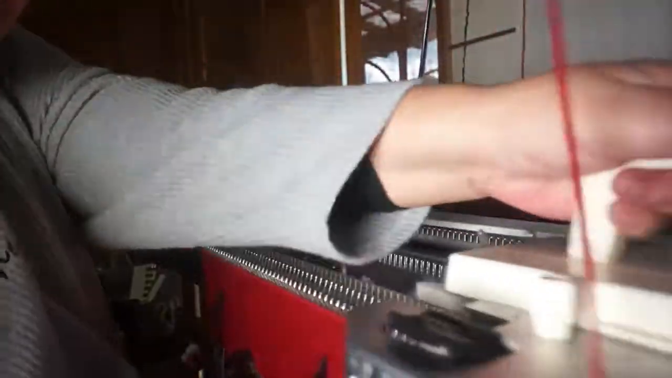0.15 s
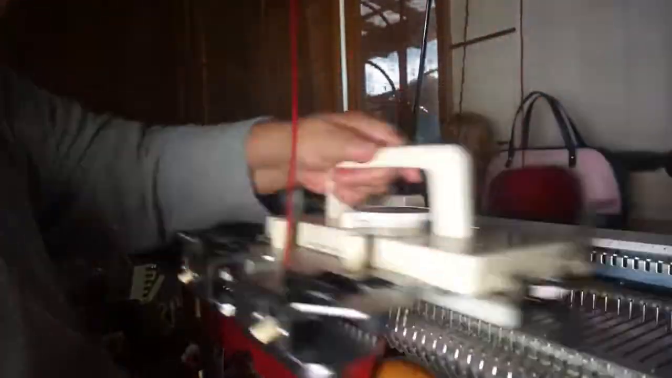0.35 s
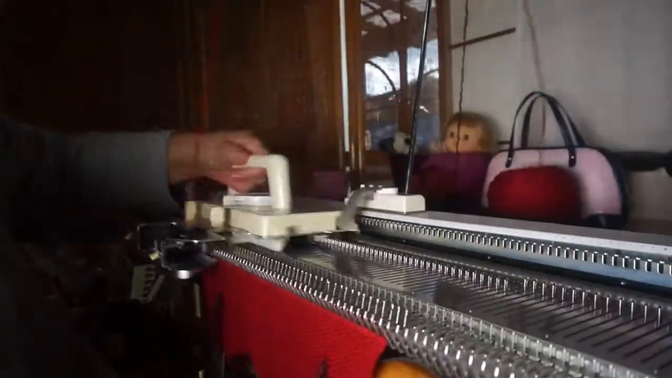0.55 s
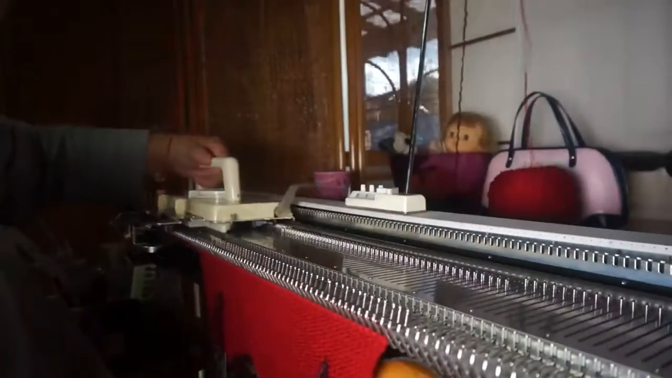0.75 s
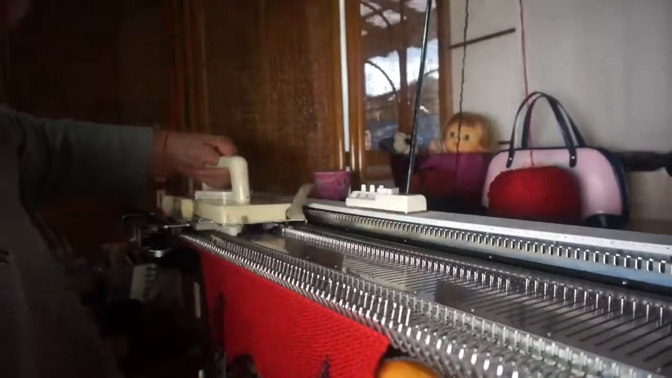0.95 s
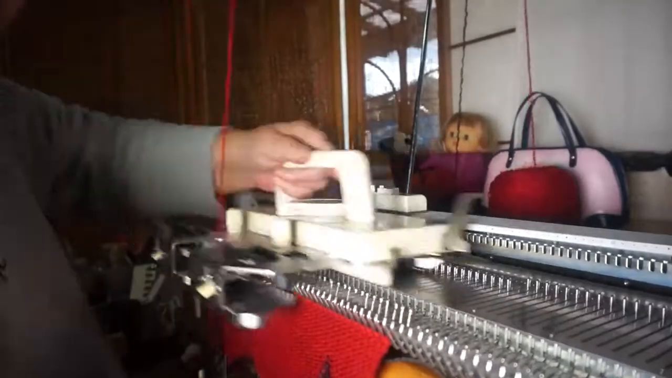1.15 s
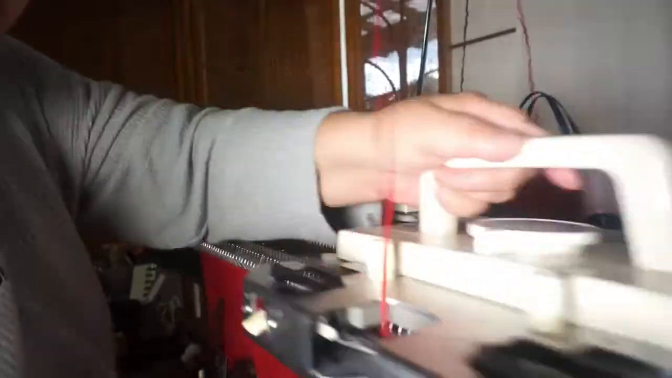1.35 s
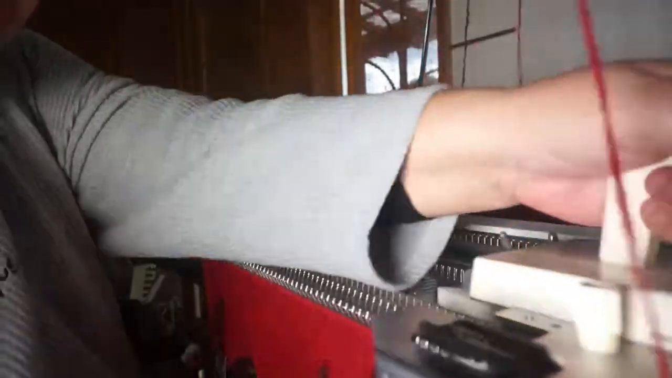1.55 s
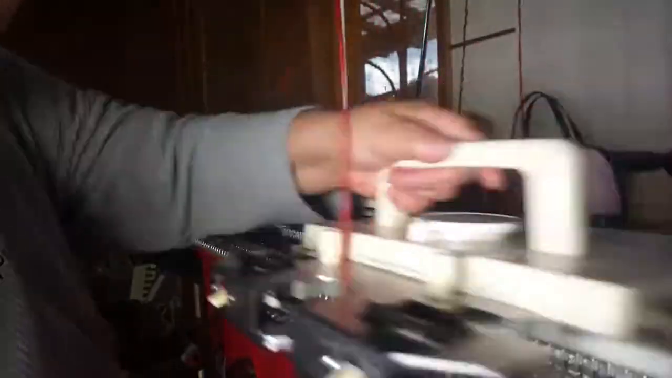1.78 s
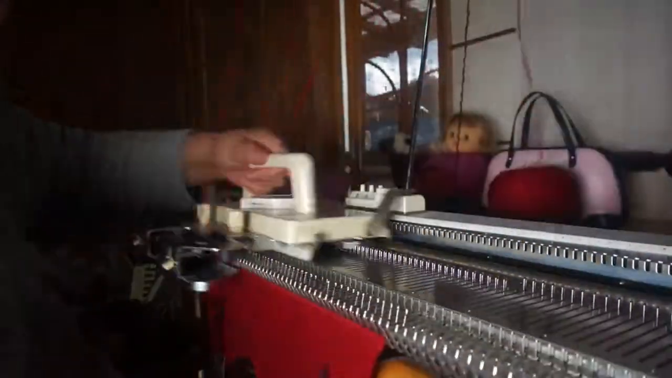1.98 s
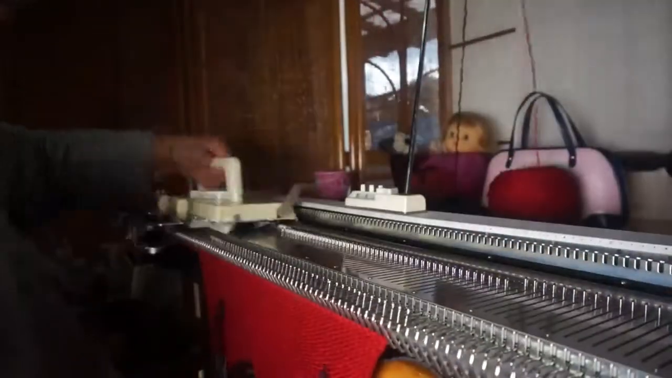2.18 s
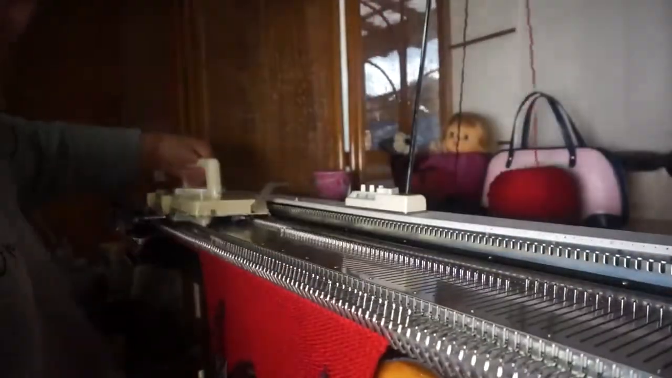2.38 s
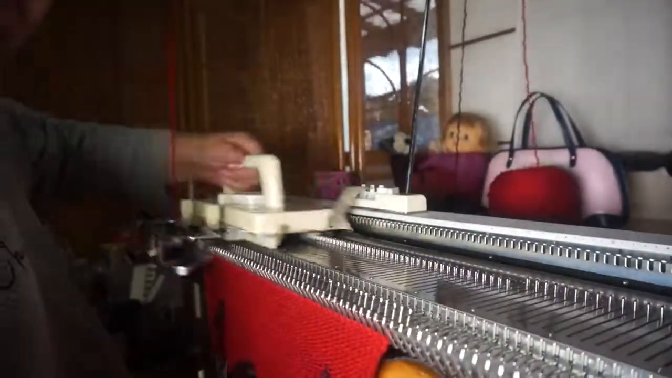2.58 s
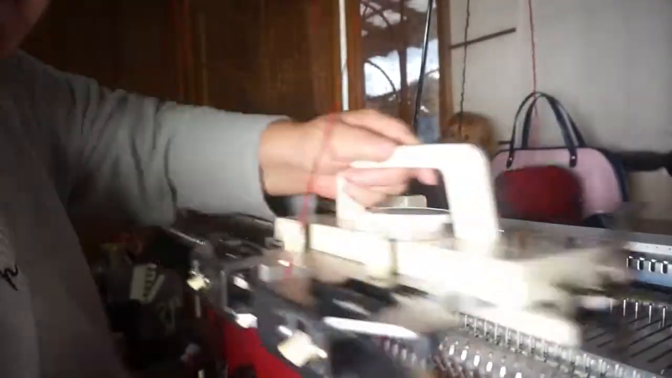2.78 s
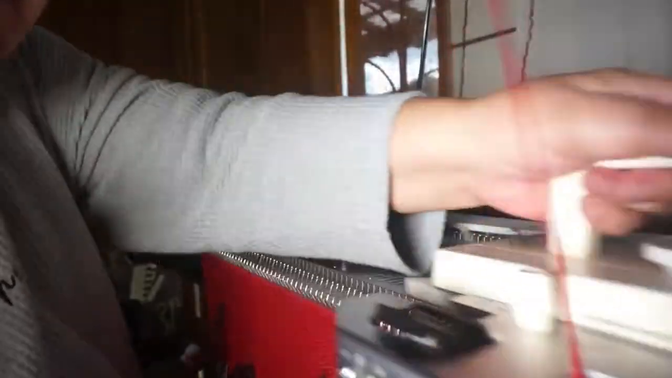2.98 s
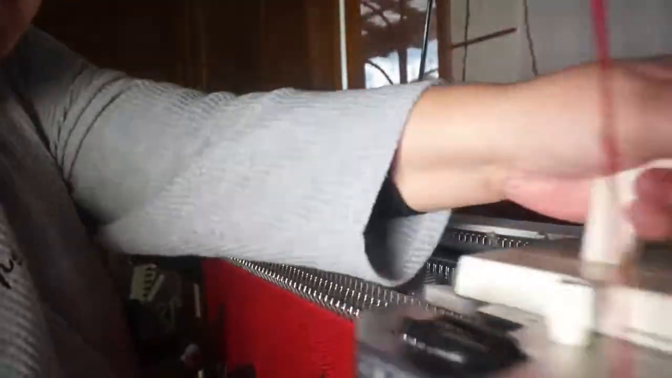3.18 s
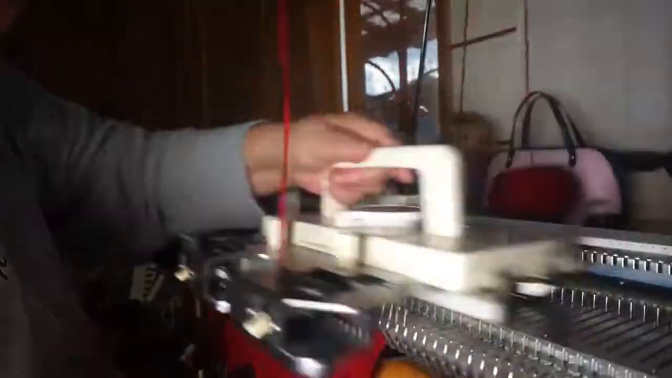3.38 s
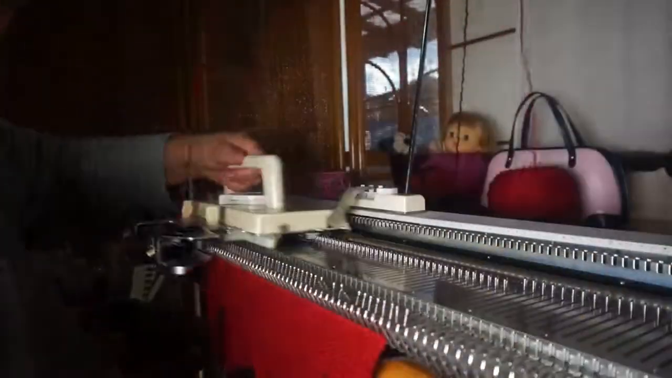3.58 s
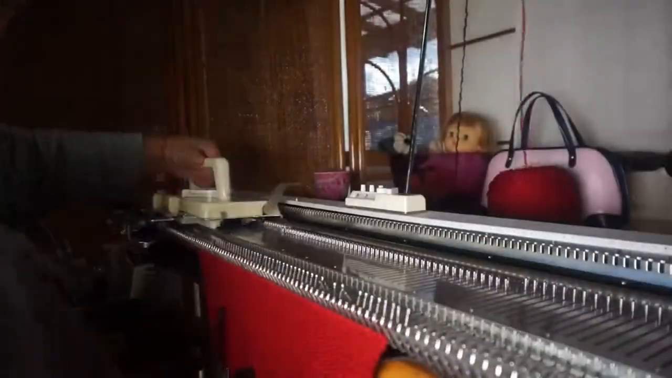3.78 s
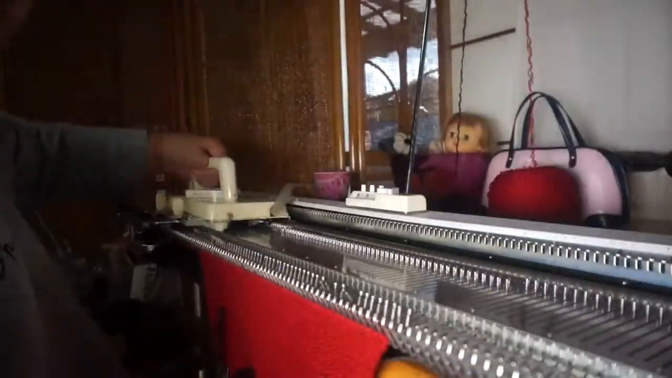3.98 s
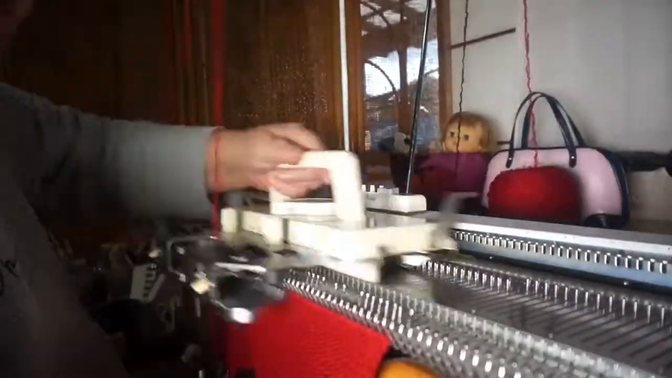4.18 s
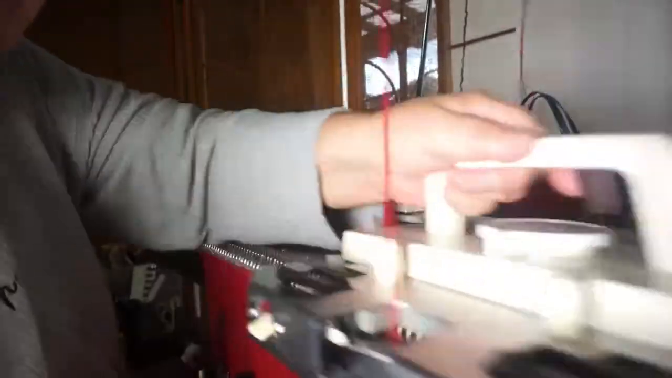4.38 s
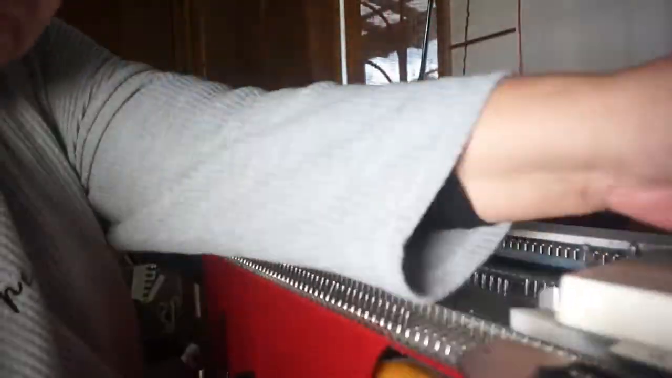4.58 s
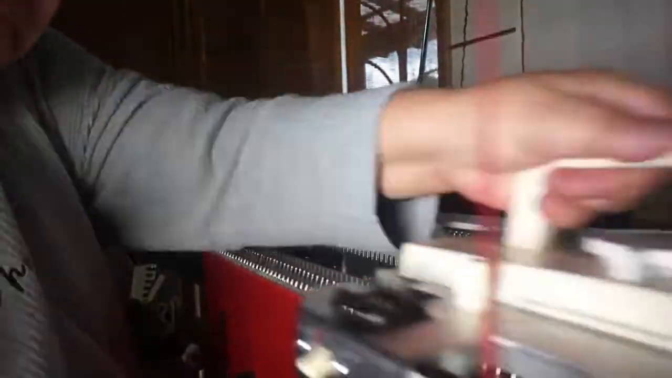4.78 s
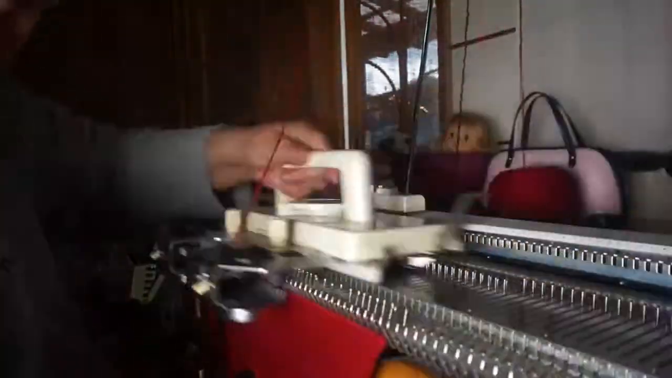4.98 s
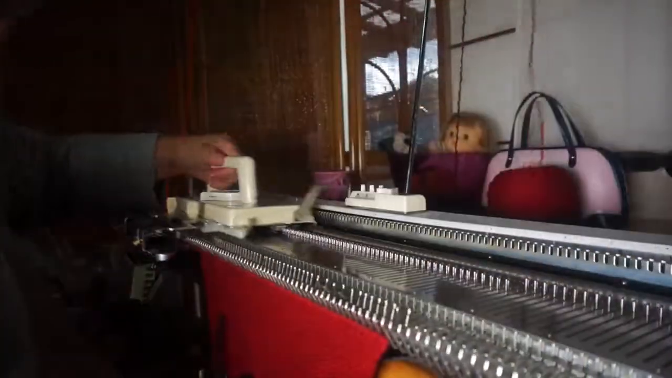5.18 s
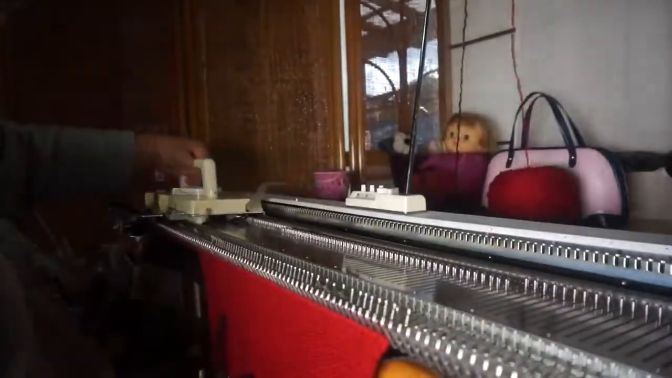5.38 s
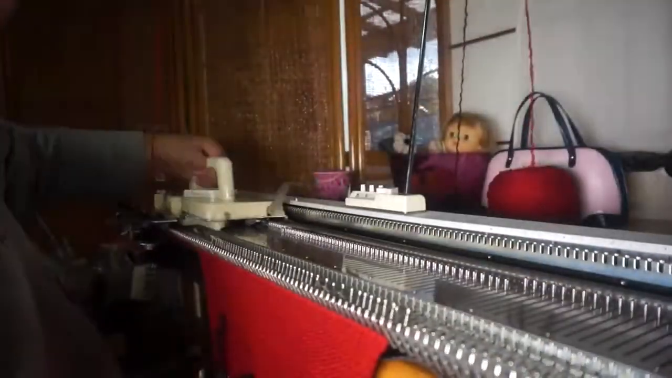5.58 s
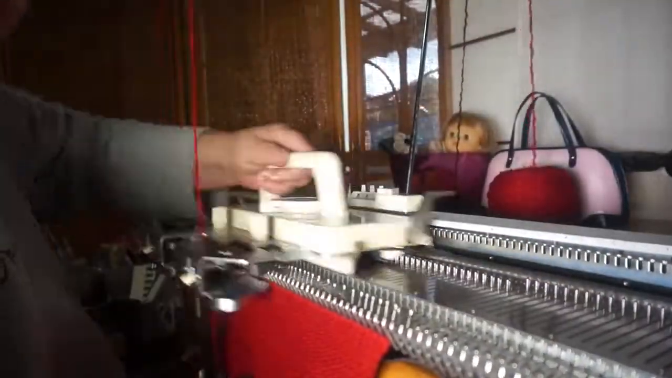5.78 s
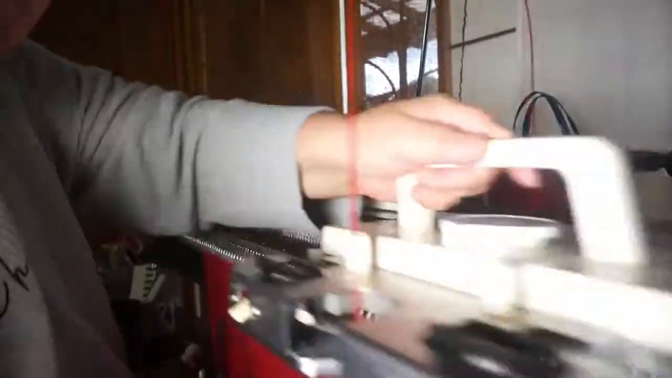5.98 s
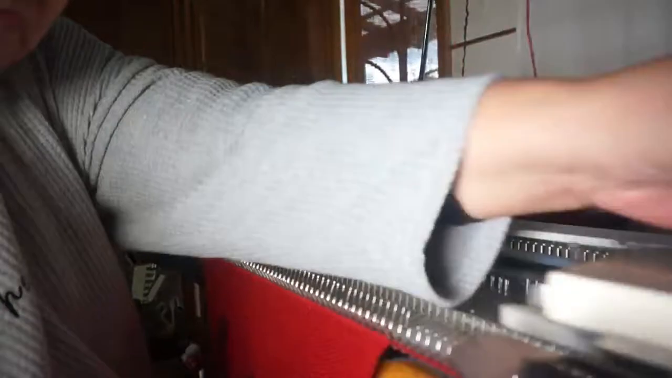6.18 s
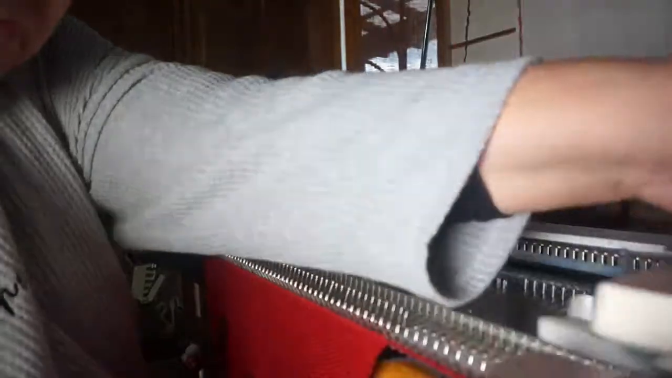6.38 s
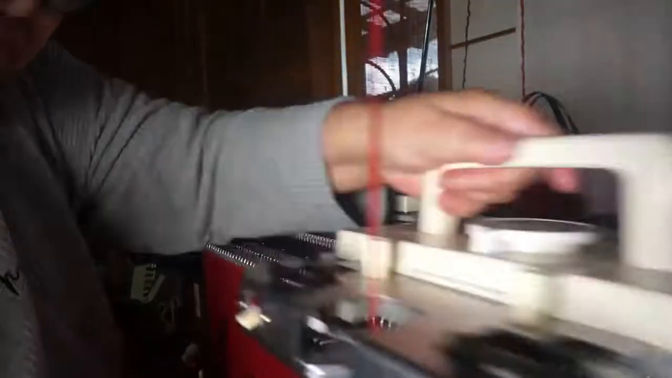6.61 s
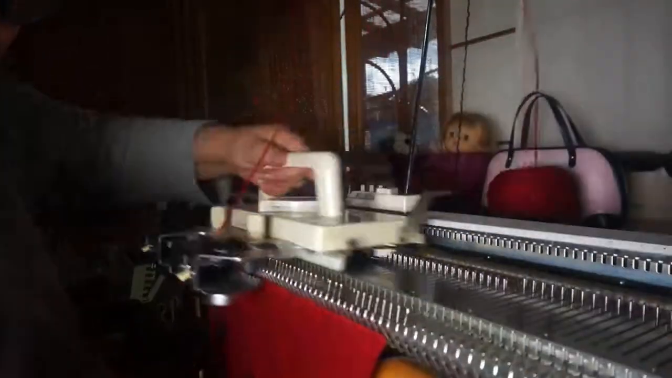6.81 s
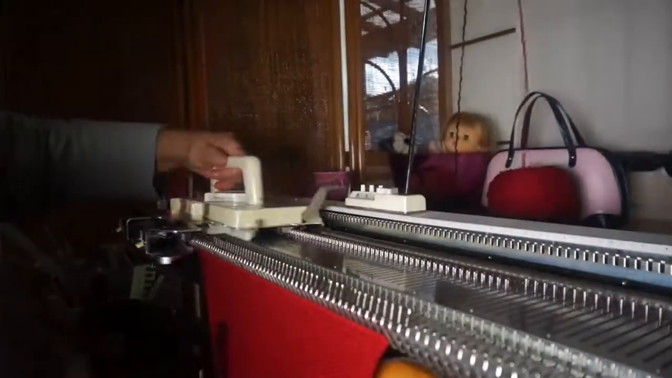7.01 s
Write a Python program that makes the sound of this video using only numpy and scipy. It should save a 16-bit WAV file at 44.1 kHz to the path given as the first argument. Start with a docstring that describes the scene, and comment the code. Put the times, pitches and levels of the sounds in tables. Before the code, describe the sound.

A hand-pushed knitting machine carriage rasps rapidly back and forth across steel needles, with sharp catch and lever snaps, in a small quiet room.

```python
"""A knitting machine carriage slides out of one pull, a latch cracks, then nine passes follow in a small room.
Cams strike the steel needle butts, over 200 a second at top speed: jittered ticks and scrapes through resonances.
Clear of the needles the carriage rubs along its rail: scraped noise through combs that glide with its place.
Catches and a trip lever snap, the shell rocks and the table shudders: short noise bursts through resonances.
Behind it lie quiet room air (shaped noise) and a faint wavering hum (two sines)."""
import sys
import numpy as np
from scipy import signal
from scipy.fft import rfft, irfft, next_fast_len
from scipy.io import wavfile
from scipy.ndimage import map_coordinates

SR = 44100
rng = np.random.default_rng(int(sys.argv[2]) if len(sys.argv) > 2 else 0)


def transcribe(u):
    """Save the signal u as a 16-bit wav file named by the first command-line argument.

    u: samples, shape (n,) or (channels, n), limited to [-1, 1]; the rate is SR.
    q: integer samples, one column per channel.
    """
    v = np.clip(np.atleast_2d(u).T, -1, 1)
    q = np.round(v * 32767).astype(np.int16)
    wavfile.write(sys.argv[1], SR, q)


N = 310884
TOP_HZ = 11150

# room air spectrum: f/Hz, relative level/dB
AIR_SPECTRUM = [(25, -33), (60, -0.5), (105, -6.5), (150, 2.5), (220, 2.5), (300, -7.5), (400, -1),
                (550, -23.5), (850, -10.5), (1300, -17.5), (3000, -32), (11000, -45)]
# hum partials: f/Hz, mean level/dB rms
HUM_PARTIALS = [(105, -70.5), (215, -73.5)]
# reverberation: f/Hz, t60/s
ROOM_T60 = [(150, 0.24), (1000, 0.31), (4000, .24), (11000, 0.13)]
# left-right likeness: f/Hz, likeness/1
EAR_LIKENESS = [(30, .9), (110, 1), (300, 0.91), (600, .93), (1200, 0.8), (2500, 0.86), (4200, 0.72),
                (7500, 0.86), (11000, .93)]

# cam latch and other small catches: t/s, relative level/dB, treble/dB (half is added to the crack)
CATCH_EVENTS = [(0.0598, -13, -15.5), (0.236, -46, -14), (0.7422, -19.5, -11.5), (0.95, -37, -10),
                (1.5414, -15, -10), (1.5848, -26, -7.5), (2.217, -18, -8), (2.4658, -36, -16.5),
                (3.0106, -23.5, -14.5), (3.0565, -16, -6.5), (3.745, -18, -8), (3.982, -35, -13),
                (4.5082, -24, -12), (4.5496, -15, -12), (4.754, -53, -20.5), (5.5622, -37, -14),
                (6.1789, -12.5, -16), (6.2407, -37.5, -12), (6.52, -46, -12), (6.555, -37.5, -9.5)]
# carriage strikes the trip lever: t/s, snap level/dB, relative knock level/dB
TRIP_EVENTS = [(.631, -17, -19), (1.131, -32.5, -20.5), (2.115, -16.5, -23), (2.64, -33.5, -28.5),
               (3.648, -17.5, -22.5), (4.185, -37.5, -29.5), (5.18, -19.5, -23.5), (5.81, -27.5, -22.5),
               (6.973, -15.5, -20.5)]
# loose shell rocks as the hand turns round: t/s, relative level/dB
ROCK_EVENTS = [(0.173, -41), (0.233, -54), (1.588, -40), (1.66, -37), (2.452, -45), (3.913, -35),
               (3.982, -37.5)]
# table shudders faintly under the moving carriage: t/s, level/dB
SHUDDER_EVENTS = [(1.18, -54), (2.71, -54), (2.93, -50), (3.64, -52), (4.33, -55), (5.735, -51)]

# table resonances: f/Hz, width/Hz, relative level/dB
TABLE_MODES = [(65, 25, 0), (100, 30, -1.5), (160, 35, -4)]
# shell jolted by the lever: f/Hz, width/Hz, relative level/dB
KNOCK_MODES = [(394, 38, -13), (491.8, 40, -7.5), (586.2, 30, 1), (713, 50, 0.5), (816, 46, 4.5),
               (980, 110, -6.5), (1420, 88, -7.5)]
# steel catches: f/Hz, width/Hz, relative level/dB
LATCH_MODES = [(837, 110, -12), (960, 59, -4.5), (1080, 52, -4), (2066, 33, -7), (2620, 60, -9),
               (2992, 45, -3.5), (4234, 65, -2.5), (6780, 93, -5), (9000, 79, -4.5), (10640, 330, -7)]
# carriage shell: f/Hz, width/Hz, relative level/dB
SHELL_MODES = [(591.3, 28.5, -4.5), (661, 46, 0), (723, 44, 2), (811, 21, 4), (967, 52, 0.5)]
# shell sliding freely: f/Hz, width/Hz, relative level/dB
HOLLOW_MODES = [(336, 16, -24.5), (612, 37, 0.5), (695, 43, -3), (808, 87, -1.5)]
# rail: f/Hz, width/Hz, relative level/dB
RAIL_MODES = [(1705, 33, -0.5), (1950, 70, 0), (2207, 47, 2), (2980, 136, 0), (4164, 30, -1.5),
              (5246, 59.8, -3), (6520, 120, -6.5), (7150, 43, -7), (7850, 63, -2.5), (8070, 59, -13),
              (9560, 160, -12.5)]
# needle bed: f/Hz, width/Hz, relative level/dB
BED_MODES = [(1336, 57, -1.5), (1710, 47, -1), (2690, 149, 0), (5229, 229, -2), (11130, 650, -10)]
# idle needles, far end: f/Hz, width/Hz, relative level/dB
FAR_RING_MODES = [(3450, 2.2, -11), (5130, 4.1, -2.5), (5222, 3.27, 3), (5170, 4.5, -5), (7160, 4, -16.5)]
# idle needles, near end: f/Hz, width/Hz, relative level/dB
NEAR_RING_MODES = [(4942, 4, 0), (5195, 4, -4)]

# crack of a catch: f/Hz, relative level/dB
CRACK_SPECTRUM = [(200, -32.5), (700, 2.5), (3000, 2.5), (7000, -2), (11000, -5.5)]
# snap of the trip lever: f/Hz, relative level/dB
SNAP_SPECTRUM = [(400, -25), (1300, -3), (3000, -10), (4500, -4), (6300, 5), (8000, -5), (11000, -10.5)]
# butts rasping in the cams: f/Hz, relative level/dB
RASP_SPECTRUM = [(500, -36), (950, -3), (1500, -3.5), (2100, -1.5), (2700, -0.5), (3150, 1), (3500, -5),
                 (4500, -4.5), (5200, -2), (5800, -4), (6600, -2.5), (8000, -6.5), (9800, -10),
                 (11000, -10)]
# carriage rubbing on the rail: f/Hz, relative level/dB
SLIDE_SPECTRUM = [(600, -43.5), (1200, -5.5), (2000, -1.5), (3000, -0.5), (3700, -3), (6500, -3.5),
                  (9000, -7.5), (11200, -12.5)]
# low growl of the carriage: f/Hz, relative level/dB
GROWL_SPECTRUM = [(50, -28.5), (130, -12.5), (185, -3.5), (225, 2), (290, -4.5), (380, -0.5), (470, 6),
                  (600, -8), (1000, -37.5)]

# pushes away from the near end: sets off t/s, first cam meets needles t/s, main cam meets them t/s,
# leaves them t/s, top speed/(needles/s), run-in level/dB, run-out level/dB
PUSH_PASSES = [(0.221, 0.254, 0.357, 0.617, 232.0, -49.4, -30.7),
               (1.684, 1.735, 1.804, 2.109, 222.0, -54.8, -26.5),
               (3.24, 3.292, 3.394, 3.642, 238.0, -53.7, -28.5),
               (4.735, 4.838, 4.931, 5.193, 234.0, -56.7, -27.6),
               (6.47, 6.577, 6.675, 6.958, 217.0, -59.3, -30.3)]
# pulls back to the near end, first one already under way: same columns
PULL_PASSES = [(-0.55, -0.48, -0.42, -0.051, 226.0, -42.0, -29.4),
               (0.922, 1.007, 1.053, 1.401, 227.0, -33.0, -25.9),
               (2.427, 2.53, 2.585, 2.94, 226.0, -36.7, -28.4),
               (3.949, 4.029, 4.106, 4.438, 225.0, -40.0, -27.5),
               (5.508, 5.646, 5.726, 6.071, 228.0, -40.9, -27.6)]
# arm speed through a push: stage/1, share of top speed/1
# stages: 0 sets off, 1 first cam, 2 main cam, 3 leaves needles, 4 stops
PUSH_ARM = [(0, .11), (.8, .25), (1.3, .76), (2.25, 1), (3, .7), (3.6, .47), (4, .11)]
# arm speed through a pull: stage/1, share of top speed/1
PULL_ARM = [(0, .11), (1, .52), (2, .85), (2.4, 1), (3, .75), (4, .11)]
LAST_STOP_S = 7.28

WORK_DB = -20.8  # steel rasp, both cams in the needles
# shell levels ahead of its own trim
SHELL_WORK_DB = -8.6  # re needle work
SHELL_SLIDE_NEAR_DB, SHELL_SLIDE_FAR_DB = -10, -4.8  # re sliding
CREEP_NEAR_DB, CREEP_FAR_DB = -67, -52  # faint rub, left even at a crawl
DULL_BELOW_DB, DULL_HZ = -57, 4000  # weak sliding rubs duller: around this level, above this pitch
RATTLE_DB, NEEDLES_PER_RATTLE = -7, 5  # loose catches jiggle in sliding


def amp(db):
    """Decibels to gain."""
    return 10 ** (np.asarray(db) / 20)


def unit(x):
    """Scale to rms 1."""
    return x / np.sqrt(np.mean(np.abs(x) ** 2) + 1e-20)


def along(points, hz):
    """Interpolate (Hz, value) points on a log frequency axis."""
    f, v = np.transpose(points)
    return np.interp(np.log(hz + 1), np.log(f + 1), v)


def wobble(knots_per_s):
    """Smooth random curve."""
    knots = rng.standard_normal(int(N * knots_per_s / SR) + 4)
    return map_coordinates(knots, [np.arange(N) * knots_per_s / SR])


def filtered(x, response):
    """x times a response over frequency."""
    m = next_fast_len(N + SR // 2)
    return irfft(rfft(x, m) * response(np.fft.rfftfreq(m, 1 / SR)), m)[..., :N]


def coloured(x, spectrum):
    """x through a broad spectrum, unit power gain."""
    return filtered(x, lambda hz: unit(amp(along(spectrum, hz)) * (hz < TOP_HZ)))


def rung(x, modes):
    """x through a body's resonances of alternating sign, unit power gain."""
    def response(hz):
        total = 0
        for k, (centre, width, db) in enumerate(modes):
            damping = 1j * hz * width
            total = total + (-1) ** k * amp(db) * damping / (centre ** 2 - hz ** 2 + damping)
        return unit(total)
    return filtered(x, response)


def dulled(x):
    """Roll off above DULL_HZ."""
    return filtered(x, lambda hz: 1 / (1 + (hz / DULL_HZ) ** 2))


def bursts(times_s, levels_db, t60):
    """Contacts that chatter briefly: noise decaying by 60 dB in t60 s, cut at 0.2 s."""
    out, t = np.zeros(N + SR), np.arange(SR // 5) / SR
    for s, db in zip(times_s, levels_db):
        start = max(round(s * SR), 0)
        out[start:start + len(t)] += amp(db - 60 * t / t60) * rng.standard_normal(len(t))
    return out[:N]


def ticks(travel, scatter, size_db, count):
    """Each of count cams strikes once per needle, scattered in time (needles) and strength (dB)."""
    out, needles = np.zeros(N), np.arange(int(travel[-1]))
    for _ in range(count):
        struck = needles + rng.random() + scatter * rng.standard_normal(len(needles))
        at = np.interp(struck, travel, np.arange(N)).astype(int)
        strength = amp(size_db * np.clip(rng.standard_normal(len(at)), -2, 2))
        out += np.bincount(at, strength, N)
    return unit(out / np.sqrt(np.gradient(travel)))  # power independent of speed


def scraped(hits, t60):
    """Every hit drags on as a short noise scrape, 60 dB down in t60 s."""
    t = np.arange(SR // 20) / SR
    power = np.abs(signal.fftconvolve(hits ** 2, amp(-60 * t / t60) ** 2)[:N])
    return unit(np.sqrt(power) * rng.standard_normal(N))


def delayed(x, place, near_s, far_s):
    """x over a path whose length follows the carriage."""
    delay_s, n = near_s + (far_s - near_s) * place, np.arange(N)
    return np.interp(n - delay_s * SR, n, x)


def swept(x, place, near_s, far_s, echo_db):
    """Waves return from an end of the bed as the carriage moves: a comb of gliding resonances."""
    echo = amp(echo_db) * delayed(x, place, near_s, far_s)
    return (x + echo) / np.hypot(1, amp(echo_db))


def echoed(x, t60_points):
    """x through a diffuse noise tail, each frequency dying at its own rate."""
    hz, t, z = signal.stft(rng.standard_normal(SR // 2), SR, nperseg=256)
    decay = amp(-60 * t / along(t60_points, hz)[:, None])
    tail = signal.istft(z * decay, SR, nperseg=256)[1]
    late = np.pad(x, (SR // 300, 0))
    return signal.fftconvolve(late, tail / np.linalg.norm(tail))[:N]


def background():
    """Quiet room air as shaped noise, and hum partials wavering in level and phase."""
    t = np.arange(N) / SR
    hum = np.zeros(N)
    for hz, db in HUM_PARTIALS:
        level = amp(db + 2 * wobble(4)) * np.sqrt(2)
        hum += level * np.sin(2 * np.pi * hz * t + 0.59 * wobble(7))
    return hum + amp(-63) * coloured(rng.standard_normal(N), AIR_SPECTRUM)


def knocks():
    """The trip lever snaps and jolts the hollow shell, which also rocks at turns; the table shudders."""
    trip_s, snap_db, knock_db = np.transpose(TRIP_EVENTS)
    snap = coloured(bursts(trip_s, snap_db, t60=0.05), SNAP_SPECTRUM)
    jolt = rung(bursts(trip_s + 0.00191, knock_db + 2, t60=0.095), KNOCK_MODES)
    turn_s, turn_db = np.transpose(ROCK_EVENTS)
    rock = rung(bursts(turn_s, turn_db - 0.5, t60=0.022), SHELL_MODES)
    shudder = rung(bursts(*np.transpose(SHUDDER_EVENTS), t60=0.2), TABLE_MODES)
    return snap + jolt + rock + shudder


def catches():
    """Small steel catches snap over with a crack and a short ring; the shell rings on faintly."""
    s, db, treble_db = np.transpose(CATCH_EVENTS)
    crack = coloured(bursts(s, db + .5 * treble_db - 7, t60=0.039), CRACK_SPECTRUM)
    shell = rung(bursts(s, db - 32, t60=.35), SHELL_MODES)
    latch = rung(bursts(s, db - 6, t60=0.022), LATCH_MODES)
    return crack + latch + shell


def turns():
    """Times at which the hand turns round, with the first start and the last stop, in s."""
    return np.sort([row[0] for row in PUSH_PASSES + PULL_PASSES] + [LAST_STOP_S])


def rise(t, attack_s):
    """0 before t = 0, then closing in on 1."""
    return 1 - np.exp(-np.maximum(t, 0) / attack_s)


def passes(rows, arm, first_share, first_attack_s, main_attack_s, release_s,
           fade_db_per_s, brake_s, brake_power, set_off_s):
    """The carriage slides in, two cams bite in turn and let go, it brakes: speed, needle work, sliding."""
    t, ends = np.arange(N) / SR, turns()
    speed, work, slide = np.zeros((3, N))
    for start, first, main, leave, top, in_db, out_db in rows:
        stop = ends[np.searchsorted(ends, start) + 1]
        on = (t >= start) & (t < stop)
        s, marks = t[on], [start, first, main, leave, stop]
        stage = np.interp(s, marks, np.arange(len(marks)))
        speed[on] = top * np.interp(stage, *np.transpose(arm))
        engaged = .5 - .5 * np.tanh((s - leave) / release_s)
        first_bite = first_share * rise(s - first, first_attack_s)
        main_bite = (1 - first_share) * rise(s - main, main_attack_s)
        work[on] = amp(WORK_DB) * engaged * (first_bite + main_bite)
        brake = np.minimum((stop - s) / brake_s, 1) ** brake_power
        run_out = amp(out_db - fade_db_per_s * np.maximum(s - leave, 0)) * brake
        run_in = amp(in_db) * rise(s - start, set_off_s)
        slide[on] = np.hypot(run_in * engaged, run_out * (1 - engaged))
    return np.array([speed, work, slide])


def motion():
    """Needles passed, place on the bed (0 near, 1 far), strengths of needle work and sliding."""
    away = passes(PUSH_PASSES, PUSH_ARM, first_share=.8, first_attack_s=.063, main_attack_s=.035,
                  release_s=.054, fade_db_per_s=30.6, brake_s=.131, brake_power=1.28, set_off_s=.031)
    back = passes(PULL_PASSES, PULL_ARM, first_share=.29, first_attack_s=.034, main_attack_s=.025,
                  release_s=.043, fade_db_per_s=142, brake_s=.139, brake_power=.4, set_off_s=.085)
    speed, work, slide = away + back
    travel = np.cumsum(np.maximum(speed, 10)) / SR
    ends = turns()
    travel_at_ends = np.interp(ends, np.arange(N) / SR, travel)[1:]
    place = np.interp(travel, travel_at_ends, np.arange(len(ends) - 1) % 2)
    return travel, place, work, slide


def rail_slide(travel, rub, slide):
    """Rubbing excites the rail, duller when weak; loose catches jiggle along."""
    rail = unit(coloured(rub, SLIDE_SPECTRUM) + amp(-4.5) * rung(rng.standard_normal(N), RAIL_MODES))
    bright = slide / (slide + amp(DULL_BELOW_DB))
    rail = bright * rail + (1 - bright) * dulled(rail)
    jiggle = scraped(ticks(travel / NEEDLES_PER_RATTLE, scatter=.4, size_db=4, count=1), t60=.02)
    return amp(-.7) * rail + amp(RATTLE_DB) * dulled(rung(jiggle, LATCH_MODES))


def needle_rasp(travel, butts):
    """Butts tick and scrape through the cams, ringing the bed."""
    drag = scraped(ticks(travel, scatter=.4, size_db=2.5, count=3), t60=0.052)
    rattle = unit(0.54 * butts + drag)
    bed = rung(scraped(butts, t60=0.0027), BED_MODES)
    return unit(coloured(rattle, RASP_SPECTRUM) + amp(-12.5) * bed)


def idle_ring(steel, place, working):
    """Idle needles at either end keep ringing after the carriage has brushed them."""
    far = rung(steel * amp(-42 + 26 * place * (1 - working)), FAR_RING_MODES)
    near = rung(steel * (1 - place) * (1 - working), NEAR_RING_MODES)
    return far + amp(-23) * near


def carriage(travel, place, work, slide):
    """Butts rattle through the cams; out of work, the hollow shell just slides on its rail."""
    rasp_db = 20 * np.log10(np.hypot(work, slide) + amp(-80))
    creep = amp(CREEP_NEAR_DB + (CREEP_FAR_DB - CREEP_NEAR_DB) * place)
    hollow = amp(SHELL_SLIDE_NEAR_DB + (SHELL_SLIDE_FAR_DB - SHELL_SLIDE_NEAR_DB) * place) * slide
    shell_db = 10 * np.log10((amp(SHELL_WORK_DB) * work) ** 2 + hollow ** 2 + creep ** 2)
    working = 1 / (1 + np.exp(-(rasp_db + 31) / 3))  # needles' share of the power

    def blend(busy, idle):
        return np.sqrt(working) * busy + np.sqrt(1 - working) * idle

    # uneven drag, more so when sliding freely
    grip = amp(.6 * wobble(70) + .8 * (1 - working) * wobble(35))
    butts = ticks(travel, scatter=.25, size_db=2.3, count=6)
    rub = scraped(ticks(travel, scatter=.4, size_db=3, count=5), t60=.03)

    steel = amp(rasp_db) * grip * blend(needle_rasp(travel, butts), rail_slide(travel, rub, slide))
    steel = swept(steel, place, near_s=0.001186, far_s=.004, echo_db=-10.5)
    steel = swept(steel, place, near_s=.011, far_s=.007, echo_db=-9.5)
    ring = idle_ring(steel, place, working)

    # leading cam lifts needle after needle: evenly when pushed away, raggedly when pulled back
    outward = np.gradient(place) > 0
    even = ticks(travel, scatter=0.056, size_db=0.5, count=1)
    ragged = ticks(travel, scatter=.22, size_db=2.5, count=1)
    beat = np.where(outward, even, ragged)
    clatter = rung(unit(1.12 * beat + scraped(butts, t60=.012)), SHELL_MODES)
    free = swept(rung(rub, HOLLOW_MODES), place, near_s=.018, far_s=.0085, echo_db=-10)
    shell = amp(shell_db - 2.0) * grip * blend(clatter, free)

    rough_beat = unit(beat + 0.78 * rng.standard_normal(N))
    growl_gain = amp(shell_db - 16.5 + 2 * outward)
    growl = coloured(growl_gain * blend(rough_beat, 0.48 * rub), GROWL_SPECTRUM)
    return steel + ring + shell + growl


def scene():
    """Machine straight ahead; near walls, at changing distances, make the two ears differ."""
    travel, place, work, slide = motion()
    machine = carriage(travel, place, work, slide) + catches() + knocks()
    mid = machine + amp(-13) * echoed(machine, ROOM_T60) + background()

    def width(hz):
        return np.tan(np.arccos(np.clip(along(EAR_LIKENESS, hz), 0, .98)) / 2)

    walls = delayed(echoed(mid, [(200, 0.055), (8000, 0.05)]), place, near_s=.0005, far_s=.003)
    side = filtered(walls, width)
    return np.array([mid + side, mid - side])


def record(dry):
    """Steep low-pass at TOP_HZ."""
    return filtered(dry, lambda hz: 1 / np.sqrt(1 + (hz / TOP_HZ) ** 400))


dry = scene()
out = record(dry)
transcribe(out)
```